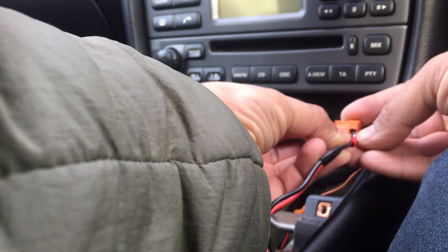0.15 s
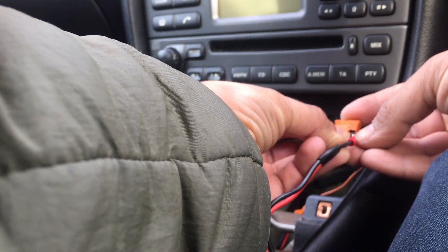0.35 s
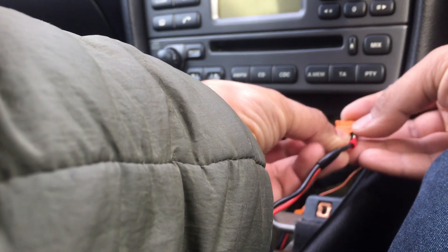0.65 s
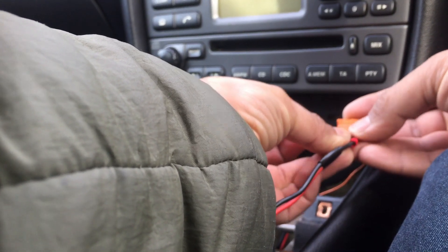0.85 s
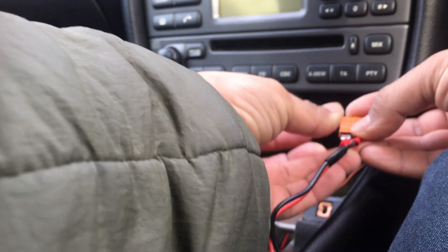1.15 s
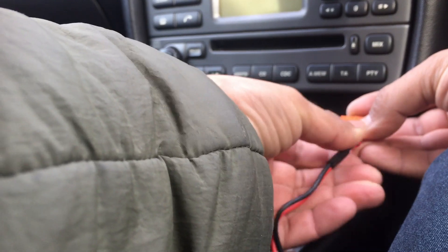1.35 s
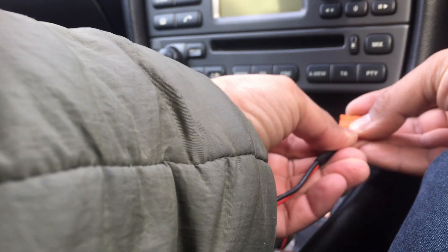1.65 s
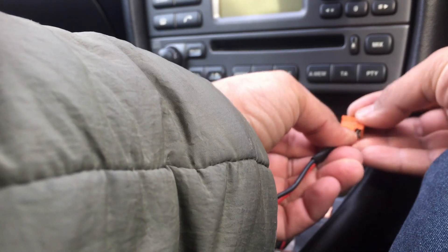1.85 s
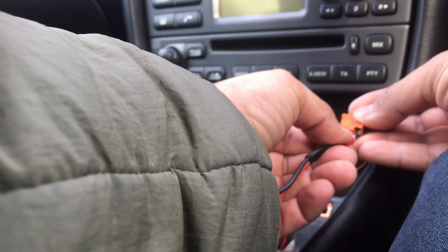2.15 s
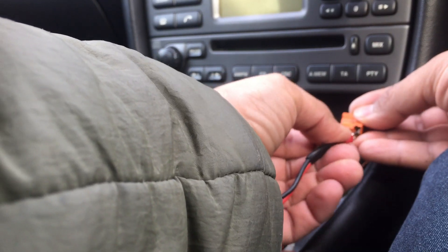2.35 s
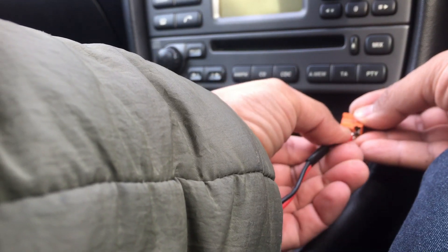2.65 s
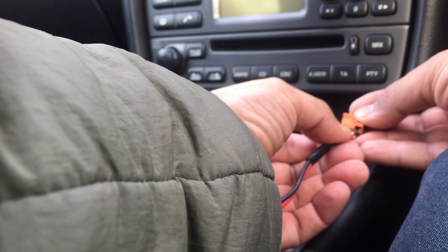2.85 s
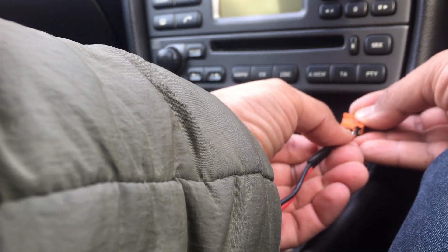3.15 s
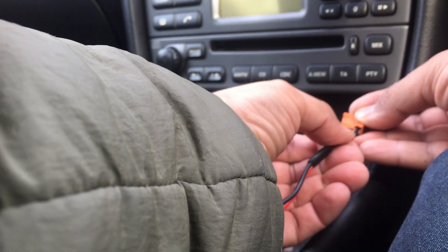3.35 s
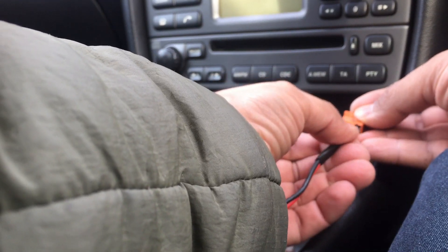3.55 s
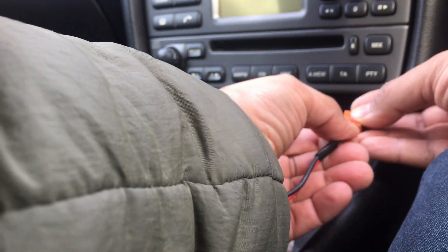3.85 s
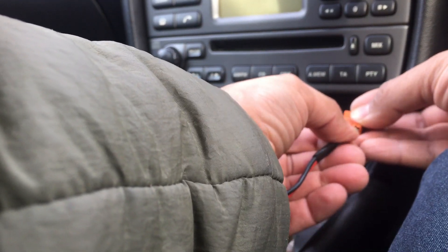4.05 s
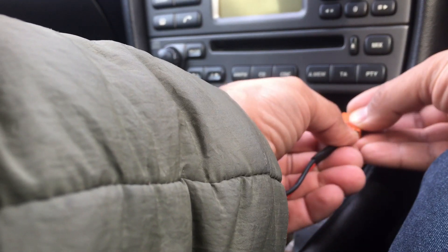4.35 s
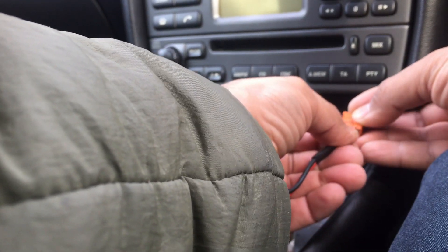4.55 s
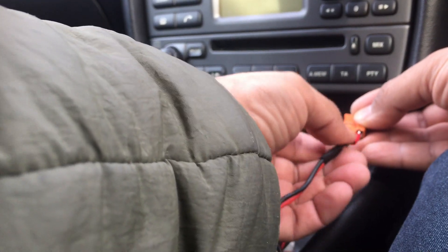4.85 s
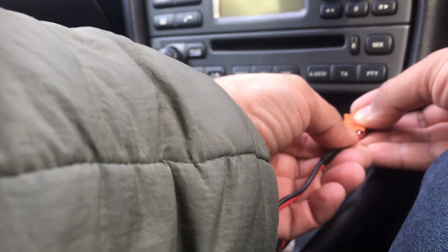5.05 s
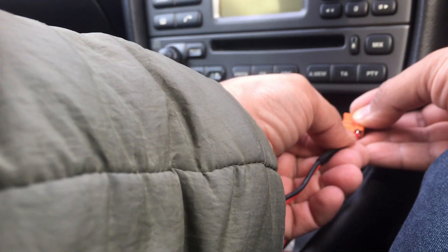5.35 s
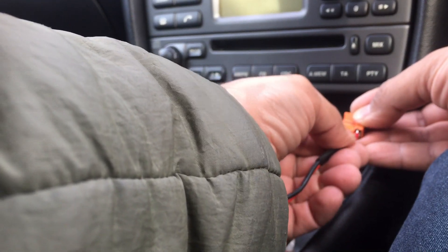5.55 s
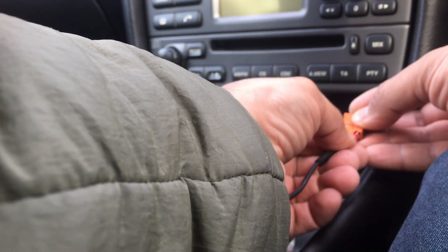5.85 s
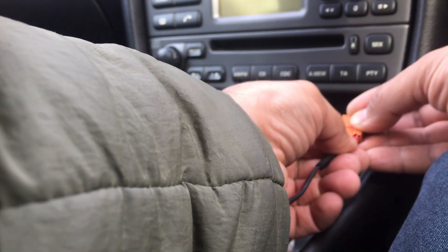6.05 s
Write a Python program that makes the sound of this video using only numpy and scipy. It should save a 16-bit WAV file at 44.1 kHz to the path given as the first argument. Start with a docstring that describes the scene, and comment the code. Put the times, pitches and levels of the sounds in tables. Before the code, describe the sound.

Light clicks, soft hand thuds and faint sleeve rustle close up in a car cabin, ending with one crisp, bright plastic snap.

```python
"""Inside a parked car, two hands work wire terminals into a small plastic connector.
Terminals tick and scrape as bursts of micro-slips ringing damped metal modes; pushes and bumps thud softly.
At last the latch snaps home: a quick run of cracks leaves the connector ringing, with an airy tail.
A padded sleeve rustles (uneven noise slips) over coloured-noise rumble and hiss in the closed, damped cabin."""
import sys
import numpy as np
from scipy import signal
from scipy.fft import rfft, irfft
from scipy.io import wavfile
from scipy.ndimage import uniform_filter1d

SR = 44100
rng = np.random.default_rng(int(sys.argv[2]) if len(sys.argv) > 2 else 0)


def unload_audio(sound):
    """Save the sound as a 16-bit wav file, at the path given as the first command line argument."""
    columns = np.transpose(np.atleast_2d(sound))
    # keep every value between -1 and 1, then stretch to whole-number steps
    steps = np.round(np.clip(columns, -1, 1) * 32767)
    wavfile.write(sys.argv[1], SR, steps.astype(np.int16))


N = 273420
TIME_S = np.arange(N) / SR
HIT_TIME_S = np.arange(16384) / SR  # time axis of a single hit

# Rumble spectrum. Each row: frequency in Hz, level in dB.
RUMBLE_COLOUR = [(20, -28), (40, -5), (60, 2.5), (120, -3.5), (190, -2.5), (280, -4), (450, -12),
                 (800, -20), (1600, -29.5), (5000, -51.5)]
# Hiss spectrum. Each row: frequency in Hz, level in dB.
HISS_COLOUR = [(300, 4), (1000, -2), (2500, -3.5), (5000, -9), (8500, -9.5), (12500, -12.5), (16000, -17.5)]
RUMBLE_START_DB, RUMBLE_DB_PER_S, HISS_DB = -68.5, -0.39, -75.5
# The rumble swells with the rustle, more for longer swells: level over the rustle at this half length.
HEAVE_DB, HEAVE_HALF_S = 1.5, 0.13

# Swells of soft rustling hiss; the last is the airy tail after the latch.
# Each row: middle in seconds, level in dB, half length in seconds.
RUSTLE_SWELLS = [(0.46, -68, 0.031), (0.585, -65.5, 0.046), (1.083, -81, 0.4), (1.244, -72.5, 0.11),
                 (1.866, -75.5, 0.2), (2.393, -73.5, 0.1), (4.33, -79, 0.22), (4.723, -72.5, .07),
                 (5.852, -69.5, 0.05)]
# Rustle spectrum. Each row: frequency in Hz, level in dB.
RUSTLE_COLOUR = [(300, -4), (1000, 0), (2500, 1), (4000, -0.5), (7000, -4.5), (11000, -6.5), (16000, -12)]
RUSTLE_REST_DB = -75.5

# Skin rubbing as the grip shifts. Each row: middle in seconds, level in dB, half length in seconds.
REGRIPS = [(1.266, -69, 0.16), (4.354, -71, 0.18), (4.703, -65.5, 0.088)]
# Skin-on-plastic spectrum. Each row: frequency in Hz, level in dB.
REGRIP_COLOUR = [(80, -7), (270, 2.5), (400, -7), (600, -3.5), (1200, -29), (5000, -42)]

# Pushes that jolt the hands. Each row: start in seconds, level in dB, strongest frequency in Hz,
# fall to both sides in dB per octave.
JOLTS = [(0.4568, -40.5, 298, 4), (.925, -52.5, 202, 17), (1.934, -56.5, 220, 7), (3.034, -59.5, 1010, 21),
         (3.074, -49, 273, 13), (3.59, -52.5, 228, 11), (3.8325, -42, 167, 6), (5.771, -53.5, 650, 2.5)]
# Cabin air modes. Each row: frequency in Hz, level in dB, t60 in seconds.
CABIN_MODES = [(65, -4, 0.26), (140, 0.5, 0.0914), (189, -1, .11), (257.3, 4, 0.082), (310, -2.5, .09),
               (378.3, -10, 0.12), (490, -10, 0.098), (561, -1, 0.071), (642, -1, 0.098),
               (777, -2.5, 0.051), (989, -8, 0.1)]
# Palm thud spectrum. Each row: frequency in Hz, level in dB.
THUD_COLOUR = [(80, -15), (220, -3), (750, -1), (1300, -15), (3500, -43.5)]
THUD_RE_JOLT_DB, THUD_T60_S = -8.5, 0.09  # nominal t60
# Soft bumps of the hand. Each row: start in seconds, level in dB, frequency in Hz above which it is dull.
BUMPS = [(0.5627, -36.5, 1500), (1.177, -56.5, 90), (1.291, -49, 120)]
# Body of a bump. Each row: frequency in Hz, level in dB, t60 in seconds.
BUMP_MODES = [(50.5, -16, 0.5), (77, 0, 0.073), (132, -1, 0.063), (219, 2.5, 0.033), (344, -4, 0.017),
              (810, -2.5, 0.016)]

# Terminal sliding under steady pressure. Each row: middle in seconds, level in dB, half length in seconds,
# lowest and highest frequency in Hz.
RUBS = [(0.387, -60, 0.016, 8000, 10100), (0.589, -49, .042, 3200, 5800), (1.254, -57.5, 0.046, 1900, 4420),
        (1.636, -54, 0.039, 2200, 5000)]
RUB_GRAIN_DB, RUB_GRAINS_PER_S, RUB_RING_DB = 4, 840, -8  # grain: dB per unit of grip

# Firm pushes, each a double click. Each row: start in seconds, tip level in dB, tip brightest frequency in Hz,
# its fall below and above in dB per octave, seat delay in seconds, seat level in dB,
# seat brightest frequency in Hz, rebound in dB re seat.
PUSHES = [(0.4565, -35.5, 11500, 0.39, 11, 0.0025, -41, 4270, -5),
          (1.9986, -44, 9000, 8.3, 4.9, 0.0018, -41, 4700, -27),
          (3.029, -50.5, 13300, 0.82, 6, 0.0044, -44.5, 7800, -7),
          (3.8328, -35, 8400, 10.2, 2, .003, -49.5, 7600, -13)]
SEAT_FALL_DB_PER_OCT, REBOUND_S = 8.5, .0095  # one weaker rebound after seating
TIP_PING_DB, SEAT_PING_DB = -12, -5
# The tip slides in faintly before it strikes.
SLIDE_LEAD_S, SLIDE_DB, SLIDE_HZ, SLIDE_T60_S = 0.019, -63, 6800, 0.092
# Light ticks. Each row: start in seconds, level in dB, brightest frequency in Hz,
# fall below and above in dB per octave, ping in dB.
TICKS = [(.401, -58.5, 8400, 18, 20, -3), (.523, -60.5, 9000, 11, 8.7, -8), (1.451, -56, 4110, 13, 2.4, -7),
         (1.514, -51.5, 2800, 1.7, 13, -9), (1.924, -54.5, 8700, 4.9, 6, -13),
         (1.9378, -46, 7450, 10, 0.93, -5), (1.9485, -58, 11000, 14, 8, -10),
         (2.7632, -61.5, 5700, 4.6, 10, -13), (2.8267, -51, 7900, 2, 3.1, -4),
         (2.9042, -57, 4280, 5.7, 7.3, -1), (3.074, -46.5, 6050, 16, 15, -9),
         (3.6714, -51, 4260, 1.1, 21, 5.5)]
# Metal dragging along plastic. Each row: start in seconds, level in dB, brightest frequency in Hz,
# nominal t60 in seconds.
SCRAPES = [(1.6425, -49.5, 2930, 0.03), (1.664, -53, 4300, 0.025), (1.672, -56.5, 4300, 0.022),
           (2.101, -61.5, 3000, 0.057), (2.305, -53, 2970, 0.048), (2.378, -53.5, 2900, 0.048),
           (2.438, -50, 3200, 0.04), (3.486, -62.5, 3860, 0.049), (3.59, -60.5, 2420, 0.064),
           (4.308, -61.5, 8600, .06), (5.19, -65, 3280, 0.033), (5.429, -65.5, 2600, 0.023)]
SCRAPE_FALL_DB_PER_OCT, TREBLE_FALL_RATIO = 5.5, 1.58  # steeper above the peak than below
SCRAPE_RISE_S = 0.00059  # a dragged tip takes hold gradually
KNOCK_DB, KNOCK_HZ = -42.5, 6600  # the first bump also knocks the connector, dully
# Terminal when struck. Each row: frequency in Hz, level in dB, t60 in seconds.
STRUCK_MODES = [(1087, -8, 0.031), (1890, -3, 0.0092), (4310, -3, 0.012), (5820, -6.5, 0.012),
                (7300, -3.5, 0.0041), (8370, -4, 0.011), (11270, 1, 0.0071), (13500, -2, 0.012),
                (15600, -5, .009)]
# Terminal dragged against the housing. Each row: frequency in Hz, level in dB, t60 in seconds.
DRAGGED_MODES = [(2396, -1, 0.03), (3980, -2, 0.032), (5400, -6, 0.034), (8300, 2, 0.024), (12400, 9, 0.01),
                 (14200, 6, 0.012)]
STRUCK_RING_DB, DRAGGED_RING_DB = -4, -7.5
CONTACT_CYCLES, PING_CYCLES = 40, 60  # t60 in cycles of the brightest pitch; contact's is nominal
FINGER_ECHO_GAIN, FINGER_ECHO_S = 0.25, .0008  # cupped hand reflects each click; typical delay

# Latch slips, lets go, chatters and strikes its seat. Each row: start in seconds, level in dB,
# nominal contact t60 in seconds.
LATCH_CONTACTS = [(5.767, -45, 0.028), (5.7704, -22.5, 0.0073), (5.7715, -21.5, .017),
                  (5.7735, -20, 0.0029), (5.7743, -18.5, 0.0019)]
# Latch contact spectrum. Each row: frequency in Hz, level in dB.
LATCH_COLOUR = [(300, -26.5), (750, -24.5), (1100, -18.5), (1450, -12), (1800, -9.8), (2700, -9.5),
                (3300, -13), (4200, -2), (4800, -9), (5500, 0.5), (7300, 2), (9000, -3.5), (11000, 2.5),
                (16000, -2)]
# Hollow knock of the housing on release. Each row: frequency in Hz, level in dB, t60 in seconds.
HOLLOW_MODES = [(1450, 0.5, .016), (2690, -1.5, 0.013)]
# Sprung barb. Each row: frequency in Hz, level in dB, t60 in seconds.
BARB_MODES = [(7310, 1, 0.013), (10970, -2, 0.008)]
# Terminal and housing together. Each row: frequency in Hz, level in dB, t60 in seconds.
CONNECTOR_MODES = [(2720, -9, .055), (4020, -6, .05), (4200, -8.5, 0.065), (5310, -1, .055),
                   (5439, -1, 0.057), (5570, -3, .055), (5959, -2, 0.036), (6230, -1.5, 0.039),
                   (6600, 0.5, .055), (7230, 0, .045), (8770, -6.5, .04), (9480, -4, 0.067),
                   (10870, 2, .045), (11200, -3, .045), (12100, -4.5, .05), (12500, -3.5, .045),
                   (13288, -3.5, .045), (14200, -4, .045), (15098, -5, .05)]
HOLLOW_DB, BARB_DB, CONNECTOR_DB = -35, -19.5, -25

MIC_DIP_HZ, MIC_DIP_Q, MIC_DIP_SHARE = 10370, 18, 0.44
MIC_LOW_HZ, MIC_TOP_HZ = 33, 15900


def undb(db):
    """Decibels to gain."""
    return 10 ** (np.asarray(db) / 20)


def fade(t60_s):
    """Exponential decay, 60 dB in t60_s."""
    return np.exp(-np.log(1000) * HIT_TIME_S / max(t60_s, 1e-4))


def swell(middle_s, half_s):
    """One bell-shaped rise and fall."""
    return np.exp(-((TIME_S - middle_s) / half_s) ** 2)


def unit(x):
    """Scale to an energy of one."""
    return x / np.sqrt(np.sum(x ** 2))


def add(out, start_s, hit, db):
    """Mix in a hit; its level is that of its energy spread over 4 ms."""
    start = int(start_s * SR)
    hit = unit(hit)[:N - start] * np.sqrt(.004 * SR)
    out[start:start + len(hit)] += undb(db) * hit


def colour(x, points):
    """Causal (minimum-phase) filter through (Hz, dB) points, by folding the cepstrum."""
    hz, db = np.transpose(points)
    f = np.maximum(np.fft.rfftfreq(len(x), 1 / SR), 1)
    gain = undb(np.interp(np.log(f), np.log(hz), db))
    cepstrum = irfft(np.log(gain), len(x))
    cepstrum[1:len(x) // 2] *= 2
    cepstrum[len(x) // 2 + 1:] = 0
    response = np.exp(rfft(cepstrum))
    return irfft(rfft(x) * response, len(x))


def noise(points):
    """Steady coloured noise, rms one."""
    return unit(colour(rng.standard_normal(N), points)) * np.sqrt(N)


def walk(rate_hz):
    """Slow random wander, spread near one."""
    k = int(SR / rate_hz)
    steps = np.repeat(rng.standard_normal(N // k + 1), k)
    smooth = uniform_filter1d(uniform_filter1d(steps, k), k)
    return smooth[:N] * np.sqrt(2)


def scrape(t60_s, catch_db=4):
    """One contact: a dying burst of micro-slips, evened in spectrum; long ones catch and let go unevenly."""
    slips = rng.standard_normal(len(HIT_TIME_S)) * fade(t60_s)
    for _ in range(2):
        spectrum = rfft(slips)
        flat = irfft(spectrum / (np.abs(spectrum) + 1e-9))
        slips = flat * fade(4 * t60_s)
    grip = np.repeat(rng.uniform(-1, 1, len(HIT_TIME_S) // 64), 64)
    onset = np.minimum(HIT_TIME_S / 0.0024, 1)
    return unit(slips * undb(catch_db * grip * onset))


def ring(modes, detune=0., build_cycles=0.0073):
    """Damped modes, each swelling over a number of its own cycles, at random phase and detune."""
    out = 0
    draws = rng.uniform(-1.205, 1, (len(modes), 2))
    for (hz, db, t60_s), (shift, phase) in zip(modes, draws):
        cycles = hz * (1 + detune * shift) * HIT_TIME_S
        envelope = fade(t60_s) * (1 - np.exp(-cycles / build_cycles))
        out = out + undb(db) * envelope * np.sin(2 * np.pi * cycles + np.pi * phase)
    return unit(out)


def excite(push, body):
    """A body's answer to a push (convolution), with an energy of one."""
    return unit(signal.fftconvolve(push, body)[:len(HIT_TIME_S)])


def cabin(x, wet_db, t60_s):
    """Dense, short reflections from dashboard, glass and seats, as decaying noise."""
    build = 1 - np.exp(-HIT_TIME_S / 0.00099)
    wash = rng.standard_normal(len(HIT_TIME_S)) * fade(t60_s) * build
    return unit(x) + undb(wet_db) * excite(x, wash)


def contact(hz, below, above, t60_s, modes, ring_db):
    """Micro-slips ring a terminal's modes; brightest at hz, falling below and above in dB per octave."""
    slip = scrape(t60_s, catch_db=12.5)
    body = excite(slip, ring(modes, detune=0.012))
    # slopes hold for three octaves below and two above
    shape = [(hz / 64, -3 * below - 30), (hz / 8, -3 * below), (hz, 0), (hz * 4, -2 * above)]
    return unit(colour(slip + undb(ring_db) * body, shape))


def click(hz, below, above, ping_db):
    """A brief contact, shorter when brighter; it echoes off the cupped hand and the pinched tip pings."""
    tick = contact(hz, below, above, CONTACT_CYCLES / hz, STRUCK_MODES, STRUCK_RING_DB)
    echo_s = FINGER_ECHO_S * 2 ** rng.uniform(-.5, .5)
    tick = unit(tick + FINGER_ECHO_GAIN * np.roll(tick, int(echo_s * SR)))
    ping = ring([(hz, 0, PING_CYCLES / hz)])
    return cabin(tick + undb(ping_db) * ping, wet_db=-6.5, t60_s=0.068)


def drag(hz, t60_s):
    """A long, gritty contact that takes hold gradually."""
    above = TREBLE_FALL_RATIO * SCRAPE_FALL_DB_PER_OCT
    grit = contact(hz, SCRAPE_FALL_DB_PER_OCT, above, t60_s, DRAGGED_MODES, DRAGGED_RING_DB)
    return cabin(grit, wet_db=-6, t60_s=0.052) * (1 - np.exp(-HIT_TIME_S / SCRAPE_RISE_S))


def background():
    """A wavering low rumble slowly settles and swells with the rustle, under a near-even hiss."""
    heave = 0
    for middle_s, db, half_s in RUSTLE_SWELLS:
        power = undb(db + HEAVE_DB) ** 2 * (half_s / HEAVE_HALF_S) ** 2
        heave = heave + power * swell(middle_s, half_s)
    rest = undb(RUMBLE_START_DB + RUMBLE_DB_PER_S * TIME_S) ** 2
    rumble = noise(RUMBLE_COLOUR) * np.sqrt(rest + heave) * undb(1.9 * walk(11))
    hiss = noise(HISS_COLOUR) * undb(HISS_DB + .4 * walk(9.8))
    return rumble + hiss


def rustle():
    """Sleeve rustle and the airy tail after the latch: a dense stream of tiny unequal noise slips."""
    sizes_db = 2.8 * np.minimum(rng.exponential(size=N), 4) + 3 * np.tanh(walk(90))
    slips = rng.standard_normal(N) * undb(sizes_db)
    swells = sum(undb(db) ** 2 * swell(middle_s, half_s) for middle_s, db, half_s in RUSTLE_SWELLS)
    power = undb(RUSTLE_REST_DB) ** 2 + swells
    return unit(colour(slips, RUSTLE_COLOUR)) * np.sqrt(N * power)


def regrips():
    """Fingers take a new hold: soft, low rubbing as swells of coloured noise."""
    level = sum(undb(db) * swell(middle_s, half_s) for middle_s, db, half_s in REGRIPS)
    return noise(REGRIP_COLOUR) * level


def hands():
    """Pushes thud in the palms and bloom late in the cabin's low modes; soft bumps thud dully."""
    out = np.zeros(N)
    for start_s, db, strongest_hz, fall in JOLTS:
        modes = []
        for hz, level_db, t60_s in CABIN_MODES:
            octaves = abs(np.log2(hz / strongest_hz))
            modes.append((hz, level_db - fall * octaves, t60_s))
        add(out, start_s, ring(modes, detune=0.025, build_cycles=5.8), db)
        add(out, start_s, colour(scrape(THUD_T60_S), THUD_COLOUR), db + THUD_RE_JOLT_DB)
    for start_s, db, dull_hz in BUMPS:
        thud = ring(BUMP_MODES, build_cycles=0.18)
        add(out, start_s, colour(thud, [(dull_hz, 0), (dull_hz * 10, -40)]), db)
    return out


def rubs():
    """A close run of tiny unequal slips swells and fades, ringing the terminal's modes."""
    out = np.zeros(N)
    size = len(HIT_TIME_S)
    grain = int(SR / RUB_GRAINS_PER_S)
    for middle_s, db, half_s, low_hz, high_hz in RUBS:
        grip = np.repeat(np.minimum(rng.exponential(size=size), 3), grain)[:size]
        envelope = np.exp(-(HIT_TIME_S / half_s - 2) ** 2)
        slips = rng.standard_normal(size) * undb(RUB_GRAIN_DB * grip) * envelope
        rub = unit(slips) + undb(RUB_RING_DB) * excite(slips, ring(DRAGGED_MODES))
        band = [(low_hz / 2, -20), (low_hz, 0), (high_hz, 0), (high_hz * 2, -30)]
        add(out, middle_s - 2 * half_s, colour(rub, band), db)
    return out


def terminals():
    """Metal tips slide, strike, seat and rebound in the housing, each contact with its own brightness."""
    out = np.zeros(N)
    for start_s, tip_db, tip_hz, below, above, delay_s, seat_db, seat_hz, rebound_db in PUSHES:
        add(out, start_s - SLIDE_LEAD_S, drag(SLIDE_HZ, SLIDE_T60_S), SLIDE_DB)
        add(out, start_s, click(tip_hz, below, above, TIP_PING_DB), tip_db)
        for late_s, db in ((delay_s, seat_db), (delay_s + REBOUND_S, seat_db + rebound_db)):
            seat = click(seat_hz, SEAT_FALL_DB_PER_OCT, SEAT_FALL_DB_PER_OCT, SEAT_PING_DB)
            add(out, start_s + late_s, seat, db)
    for start_s, db, hz, below, above, ping_db in TICKS:
        add(out, start_s, click(hz, below, above, ping_db), db)
    for start_s, db, hz, t60_s in SCRAPES:
        add(out, start_s, drag(hz, t60_s), db)
    add(out, BUMPS[0][0], click(KNOCK_HZ, below=1, above=34, ping_db=-17), KNOCK_DB)
    return out


def latch():
    """The barb's contacts crack in quick succession; release knocks the housing, the strike rings it."""
    out = np.zeros(N)
    for start_s, db, t60_s in LATCH_CONTACTS:
        crack = colour(scrape(t60_s), LATCH_COLOUR)
        add(out, start_s, cabin(crack, wet_db=-11.0, t60_s=0.072), db)
    release_s, strike_s = LATCH_CONTACTS[1][0], LATCH_CONTACTS[-2][0]
    add(out, release_s, ring(HOLLOW_MODES), HOLLOW_DB)
    add(out, strike_s, ring(BARB_MODES), BARB_DB)
    add(out, strike_s, ring(CONNECTOR_MODES), CONNECTOR_DB)
    return out


def scene():
    """Sum of all sources at one microphone."""
    soft = background() + rustle() + regrips()
    handling = hands() + rubs() + terminals() + latch()
    return (soft + handling)[None]


def record(dry):
    """The microphone drops the deepest bass, dips narrowly in the treble and cuts the top steeply."""
    dry = signal.sosfilt(signal.butter(2, MIC_LOW_HZ, "high", fs=SR, output="sos"), dry)
    b, a = signal.iirpeak(MIC_DIP_HZ, MIC_DIP_Q, fs=SR)
    dry = dry - MIC_DIP_SHARE * signal.lfilter(b, a, dry)
    return signal.sosfilt(signal.butter(18, MIC_TOP_HZ, fs=SR, output="sos"), dry)


dry = scene()
out = record(dry)
unload_audio(out)
```